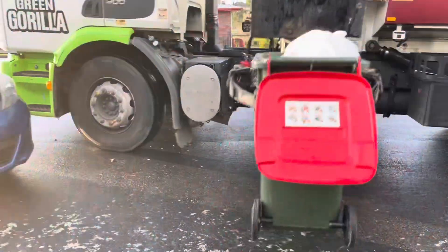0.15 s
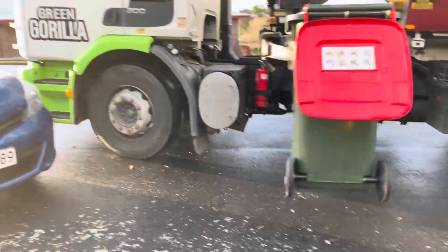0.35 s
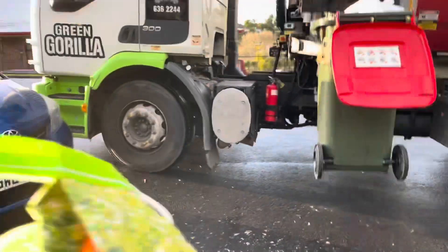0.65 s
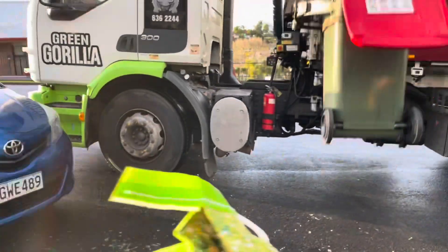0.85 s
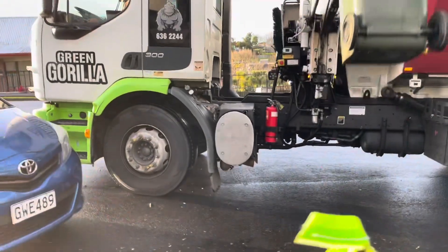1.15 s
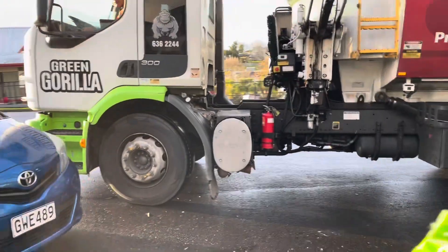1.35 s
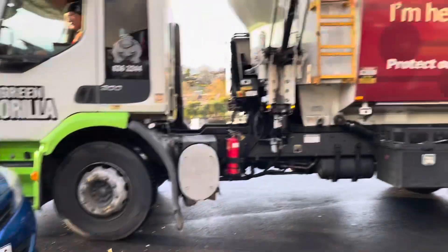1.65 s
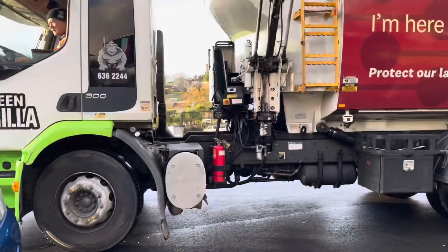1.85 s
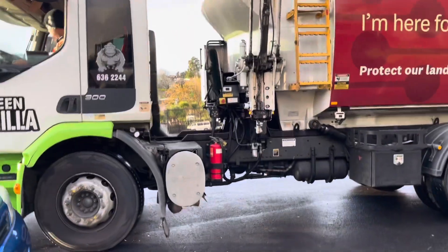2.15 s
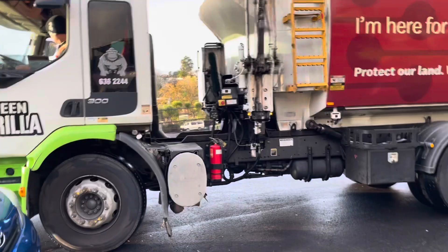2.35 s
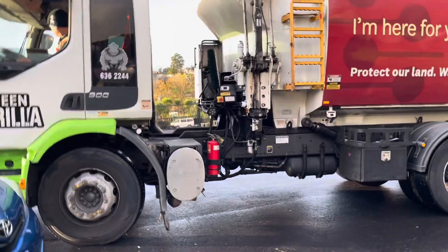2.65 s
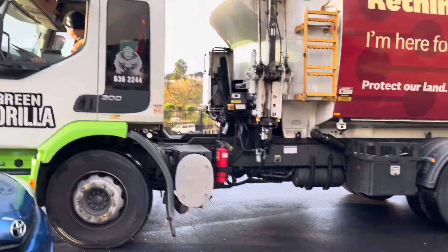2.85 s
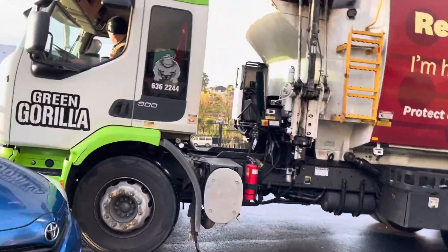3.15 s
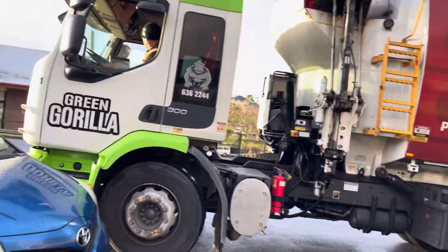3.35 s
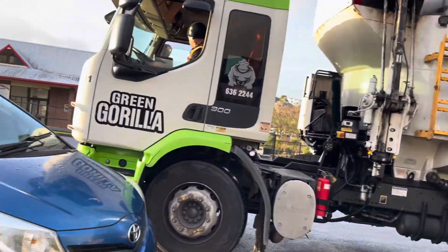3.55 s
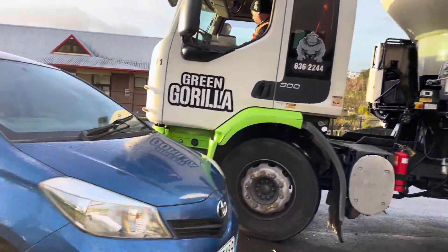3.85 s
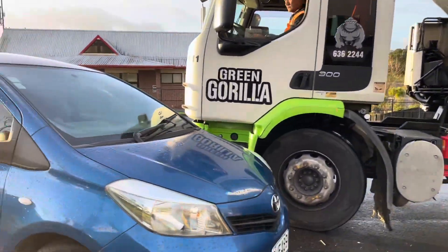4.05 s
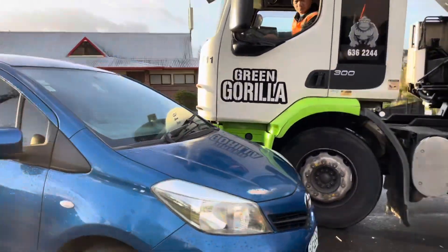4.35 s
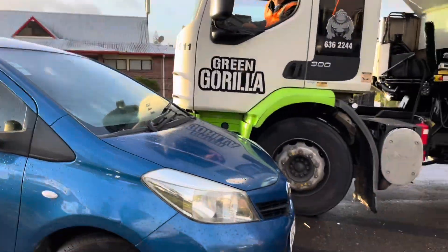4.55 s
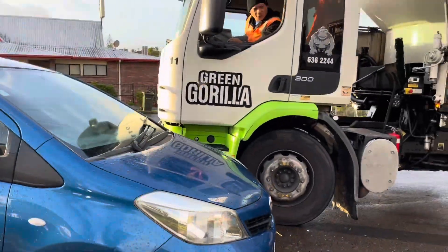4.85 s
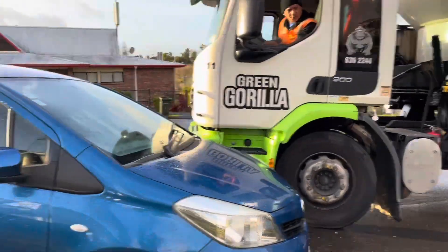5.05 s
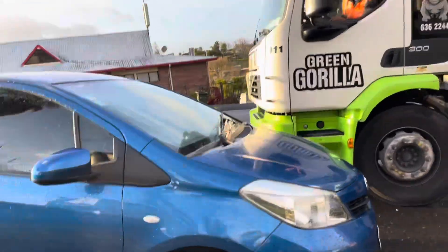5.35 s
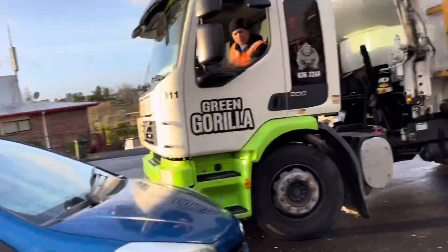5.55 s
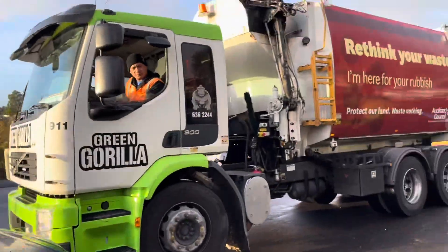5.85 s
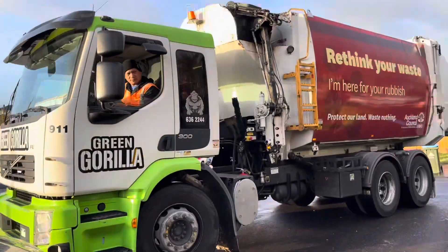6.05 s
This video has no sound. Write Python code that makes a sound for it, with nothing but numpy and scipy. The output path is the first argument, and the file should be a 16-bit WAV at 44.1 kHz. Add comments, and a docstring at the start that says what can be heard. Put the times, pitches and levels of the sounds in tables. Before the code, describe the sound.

A diesel garbage truck revs at fast idle, its hydraulic arm whining and banging a plastic bin, then drops to low idle with an air hiss.

```python
"""Street with house fronts: a six-cylinder diesel refuse truck at fast idle a few metres away, then low idle.
Exhaust: sines at the firing rate. Block and fan roar: third-octave noise. Panels: narrow noise hums.
Pump and gear whines: crank-locked sines. Lift valve: jittered harmonic buzz. Arm and plastic bin: noise-driven
steel modes plus damped thuds. Brake valve: coloured noise puffs. Hisses and chirps: narrow noise.
Decaying noise tails, convolved with the truck, give a short echo and a diffuse stereo spread."""
import sys
import numpy as np
from scipy import signal
from scipy.fft import rfft, irfft, next_fast_len
from scipy.io import wavfile
from scipy.ndimage import uniform_filter1d

SR = 44100
rng = np.random.default_rng(int(sys.argv[2]) if len(sys.argv) > 2 else 0)


def dump_mix(stems):
    """Bounce the given channels to the path in sys.argv[1] as a 16-bit WAV at rate SR."""
    frames = np.atleast_2d(stems).T  # one column per channel
    limited = np.clip(frames, -1, 1)  # hard clip at full scale
    pcm = np.round(limited * 32767).astype(np.int16)
    wavfile.write(sys.argv[1], SR, pcm)


N = 273861
FFT_N = next_fast_len(N)
T, HZ = np.arange(N) / SR, np.fft.rfftfreq(FFT_N, 1 / SR)
DECAY_60_DB = np.log(1000)  # exp(-DECAY_60_DB * t / t60) falls 60 dB in t60


def undb(db):
    """Decibels to gain."""
    return 10 ** (np.asarray(db) / 20)


def curves(table, silent=False):
    """Columns of a table over time; end values held, or -120 dB outside if silent."""
    s, *columns = np.transpose(table)
    edge = -120 if silent else None
    return [np.interp(T, s, column, edge, edge) for column in columns]


def over_hz(points):
    """An (f/Hz, value) table on the FFT bins, interpolated over log frequency."""
    hz, value = np.transpose(points)
    return np.interp(np.log(HZ + 1), np.log(hz + 1), value)


def at_hz(hz, points_hz, values):
    """A value at one frequency, interpolated over log frequency."""
    return np.interp(np.log(hz), np.log(points_hz), values)


def shape(x, gain):
    """Filter by a gain on the FFT bins."""
    return irfft(rfft(x, FFT_N) * gain, FFT_N)[:N]


def unit(x):
    """Scale to rms 1."""
    return x / np.sqrt(np.mean(x ** 2))


def walk(rate_hz):
    """Smooth random drift, spread near 1, from random knots at rate_hz."""
    knots = rng.standard_normal(int(N / SR * rate_hz) + 2)
    drift = np.interp(T * rate_hz, np.arange(len(knots)), knots)
    return 1.09 * uniform_filter1d(drift, int(SR / rate_hz))


# engine speed as pump gear tooth rate: t/s, f/Hz
PUMP_TOOTH_RATE = [(0, 157), (.3, 162), (.55, 158), (.78, 176.5), (.95, 172.3), (1.33, 170.3),
                   (1.56, 172.4), (1.84, 170.8), (2.1, 171.6), (2.7, 172), (3.2, 173), (3.33, 143),
                   (3.43, 124), (3.5, 114.5), (4.15, 115.9), (4.35, 121), (6.21, 121.2)]
TEETH_PER_TURN, FIRINGS_PER_TURN = 11, 3


def crank_turns():
    """Crank angle in turns: integrated tooth rate over the tooth count."""
    return np.cumsum(curves(PUMP_TOOTH_RATE)[0]) / TEETH_PER_TURN / SR


def idle_share():
    """0 at fast idle, 1 at low idle: ramps as the tooth rate falls from 150 to 120 Hz."""
    return np.clip((150 - curves(PUMP_TOOTH_RATE)[0]) / 30, 0, 1)


# exhaust boom: t/s, level/dB
BOOM = [(0, -32), (.45, -28.5), (.76, -29.5), (1.31, -28), (3.25, -32.5), (3.41, -46), (6.21, -46)]
# its harmonics: multiple of firing rate, level/dB re boom
BOOM_ORDERS = [(1, 2), (2, -4.5), (4, -18)]


def exhaust(turns):
    """Gas pulses at the firing rate: a few sine harmonics, each wavering in level."""
    firing_phase = 2 * np.pi * FIRINGS_PER_TURN * turns
    boom = 0
    for k, db in BOOM_ORDERS:
        boom = boom + undb(db + 2.0 * walk(10.3)) * np.sin(k * firing_phase + k)
    return np.sqrt(2) * undb(curves(BOOM)[0]) * boom


# block, fan and oil-flow ranges: centre f/Hz, fast-idle level/dB, low-idle level/dB, share of load swing [0-1]
ROAR_RANGES = [(135, -30, -34, 0.94), (723, -27.5, -26.5, 0.45), (2970, -32.5, -37.5, 0.65),
               (10660, -47, -52, 0.41)]
# roar spectrum: f/Hz, level/dB per third octave re its range
COLOUR = [(30, -22), (55, -13), (100, -8.5), (200, -9), (400, -10.5), (560, -12.5), (900, -12.5),
          (1700, -13.5), (2400, -11), (4000, -10), (5600, -10), (7500, -7), (10000, 0.5), (13000, -7.5),
          (16000, -7)]
# added to COLOUR at low idle, where the block hums near 500 Hz: f/Hz, level/dB
IDLE_COLOUR = [(30, 0), (60, 2.5), (100, 1), (250, -0.5), (370, -3.5), (520, 0.5), (700, -4), (1100, 0),
               (1900, 0), (3000, 2.5), (5000, -2), (13000, -1)]
# hydraulic load on the engine: t/s, roar swing/dB before the range's share
LOAD = [(0, 0), (.4, 3.5), (.9, 3), (1.35, 2.5), (1.55, 4.5), (2.4, 0), (2.75, 0), (2.95, 6), (3.3, 3),
        (3.6, 3), (3.9, 2.5), (4.7, 1), (5.45, -1), (5.7, 2), (6.21, 0.5)]
SCATTER_DB = 4.5  # spread between firings


def roar(turns):
    """Turbulence and block noise: third-octave bands flicker separately, treble clatters with every firing."""
    spectrum = rfft(rng.standard_normal(FFT_N))
    firings = FIRINGS_PER_TURN * turns
    strength = undb(SCATTER_DB * rng.standard_normal(N // 100))[firings.astype(int)]
    clatter = np.sin(np.pi * (firings % 1) ** 0.58) ** 2 * strength
    idle, load_db, octaves = idle_share(), curves(LOAD)[0], np.log2(HZ + 1)
    centres_hz, *columns = np.transpose(ROAR_RANGES)
    fast_colour, idle_colour = np.transpose(COLOUR), np.transpose(IDLE_COLOUR)
    out = 0
    for hz in 25 * 2 ** (np.arange(29) / 3):
        band_gain = np.cos(np.pi / 2 * np.clip(3 * (octaves - np.log2(hz)), -1, 1)) ** 2
        band = unit(irfft(spectrum * band_gain)[:N])
        fast_db, slow_db, load_share = (at_hz(hz, centres_hz, column) for column in columns)
        db = fast_db + idle * (slow_db - fast_db) + load_share * load_db
        db = db + at_hz(hz, *fast_colour) + idle * at_hz(hz, *idle_colour) + 1.0 * walk(9)
        out = out + undb(db) * band * (1 + 0.18 * min(hz / 2500, 1) * clatter)
    return out


# block panels and covers: f/Hz, half-width/Hz, fast-idle level/dB, low-idle level/dB
PANELS = [(240.5, 10.6, -42, -41), (521, 38, -46, -42.5), (1090, 50, -52, -51.5), (1400, 72, -51.5, -54.5),
          (2240, 140, -54, -52), (2730, 180, -54, -49), (3080, 120, -49, -50.5), (3530, 110, -53, -53.5),
          (3880, 110, -59, -58)]
PATCHY_DB = 2.8  # spread of a panel's level


def panels():
    """Shaken sheet metal resonates: narrow noise hums come and go independently."""
    idle, out = idle_share(), 0
    for hz, width_hz, fast_db, idle_db in PANELS:
        resonance = 1 / (1 + ((HZ - hz) / width_hz) ** 2)
        hum = unit(shape(rng.standard_normal(N), resonance))
        out = out + hum * undb(fast_db + idle * (idle_db - fast_db) + PATCHY_DB * walk(6))
    return out


# work stages by name: start t/s, end t/s
STAGES = {"lifting": (-.1, 0.79), "fast idle": (-.1, 3.25), "pumping": (0.58, 3.6),
          "tipping": (0.795, 2.72), "spinning up": (0.65, 0.894), "straining": (0.873, 1.965),
          "easing": (1.8, 2.32), "humming": (4.85, 5.52), "holding": (2.28, 2.68), "settling": (3.45, 4.18),
          "low idle": (3.8, 5.7), "waiting": (4.2, 6.3), "creeping": (5.7, 6.8)}
# pump, gear and fan whines by stage: multiple of crank rate, level/dB
WHINES = {"lifting": [(9.4, -37), (17.4, -31.5), (22, -45)], "fast idle": [(9.4, -35)],
          "pumping": [(11.03, -30.5), (7.99, -36.5), (15.14, -34.5), (22.15, -36.5)],
          "spinning up": [(80.8, -38)], "humming": [(44, -37)], "tipping": [(25, -42), (33, -32),
          (44, -51.5)], "holding": [(50.2, -39.5)], "easing": [(80.5, -41.5), (150, -46.5)],
          "straining": [(80.8, -34), (88, -53), (101, -53), (110, -47), (150, -43.5)],
          "settling": [(11, -33.5), (33, -40.5), (55, -37.5), (66, -46), (77, -39.5)],
          "low idle": [(9.4, -37), (14.4, -42.5), (24.1, -45)], "waiting": [(11, -35.5), (22, -45),
          (33, -46.5), (44, -38.5), (50.4, -44.5), (66, -46.5), (80.6, -46.5)], "creeping": [(17.7, -54),
          (22, -37), (24, -37), (50.4, -41.5), (100.3, -47)]}


def whines(turns):
    """Meshing teeth and blades: crank-locked sines swell in, waver in level and phase, and fade."""
    out = 0
    for stage, (start_s, end_s) in STAGES.items():
        on = np.clip(np.minimum((T - start_s) / 0.025, (end_s - T) / 0.11), 0, 1)
        for order, db in WHINES[stage]:
            level = undb(db + 0.65 * walk(20))
            out = out + on * level * np.sin(2 * np.pi * order * turns + 0.55 * walk(11))
    return np.sqrt(2) * out


# lift valve pitch as the arm rises: t/s, f/Hz
VALVE_PITCH = [(0, 690), (.05, 722), (.1, 732), (.4, 737), (.5, 722), (.54, 690), (.595, 618), (.64, 660),
               (.72, 690), (.79, 705), (.86, 705)]
# valve level and overtone level over time: t/s, level/dB, overtones/dB
VALVE_LEVELS = [(0, -33, -11), (.1, -32.5, -3), (.2, -31.5, -1.5), (.3, -34.5, 2.5), (.42, -25.5, -0.5),
                (.52, -31.5, 6), (.586, -23.5, -7), (.63, -33, 2), (.72, -33, 2), (.79, -36, -5),
                (.85, -66, 2)]
# valve harmonics: multiple of pitch, level/dB re valve level
VALVE_ORDERS = [(1, 0.5), (2, -8.5), (3, -11), (4, -11.5), (5, -13)]


def valve():
    """Oil forced through the valve buzzes: harmonics of one phase, whose jitter smears the overtones most."""
    phase = 2 * np.pi * np.cumsum(curves(VALVE_PITCH)[0]) / SR
    phase = phase + 0.36 * walk(41.4) + 0.31 * walk(300)
    overtones_db = curves(VALVE_LEVELS)[1]
    buzz = 0
    for k, db in VALVE_ORDERS:
        order_db = db + (k > 1) * overtones_db + 1.9 * walk(22.4)
        buzz = buzz + undb(order_db) * np.sin(k * phase)
    return np.sqrt(2) * undb(curves(VALVE_LEVELS, silent=True)[0]) * buzz


RATTLE_T60_S = 0.11
GRAIN_DB = 2  # spread between loose contacts


def contact_noise(t, rise_ms):
    """Chattering contacts: decaying noise in 3 ms grains, hardest at the first contact."""
    decay = np.exp(-DECAY_60_DB * t / RATTLE_T60_S)
    noise = rng.standard_normal(len(t)) * decay * np.minimum(1000 * t / rise_ms, 1)
    noise *= 1 + 1.05 * np.exp(-t / 0.006)
    return noise * undb(GRAIN_DB * np.repeat(rng.standard_normal(len(t) // 150), 150))


# arm modes: f/Hz before detuning, level/dB before spread and focus, t60/s before grip damping
ARM_MODES = [(322, 13.5, 0.11), (514, 6, 0.18), (660, 6, 0.027), (834, -3, 0.07), (995, -5, 0.07),
             (1292, -4.5, 0.074), (1597, -5, 0.05), (1878, -4, 0.064), (2153, -6, 0.062),
             (2408, -7.5, 0.16), (2700, -5, 0.28), (2910, -9, 0.098), (3570, -18, 0.24), (3950, -28, 0.099),
             (4720, -16, 0.022), (5470, -25, 0.02)]
GRIP_DAMPING = .45  # gripped bin shortens the arm's ring to this share
FOCUS_DB = 4.6  # fall of a mode one octave off the rattle centre
CRUNCH_DB, CRUNCH_OCTAVES = -13, .6  # CRUNCH_OCTAVES each side of the centre


def arm(rattle, centre_hz):
    """Struck steel: contact noise drives two-pole modes; the loose load adds a broad crunch."""
    edges_hz = centre_hz * 2 ** (CRUNCH_OCTAVES * np.array([-1, 1]))
    crunch = signal.lfilter(*signal.butter(2, edges_hz, "band", fs=SR), rattle)
    steel = undb(CRUNCH_DB) * crunch * np.sqrt(4000 / centre_hz)
    spreads = rng.standard_normal((len(ARM_MODES), 2))  # every blow lands elsewhere
    for (hz, db, t60_s), (detune, level_spread) in zip(ARM_MODES, spreads):
        hz, db = hz * (1 + .015 * detune), db + 2. * level_spread
        r = np.exp(-DECAY_60_DB / (t60_s * GRIP_DAMPING * SR))
        g = np.sqrt(1 - r)
        poles = [1, -2 * r * np.cos(2 * np.pi * hz / SR), r * r]
        mode = signal.lfilter([g, 0, -g], poles, rattle)
        steel = steel + undb(db - FOCUS_DB * np.log2(hz / centre_hz) ** 2) * mode * 0.18
    return steel


THUD_S, THUD_CYCLES = 0.0025, 0.71  # bin wall ring time: base plus so many cycles


def bin_thud(t, hz):
    """A soft plastic wall pushes slowly: a sine under a rounded, decaying envelope."""
    push = t / (THUD_S + THUD_CYCLES / hz)
    return -np.sin(2 * np.pi * hz * t) * push * np.exp(1 - push)


# arm and bin blows: t/s, rattle level/dB, thud level/dB, thud f/Hz, rattle centre f/Hz, rise/ms, crack level/dB
KNOCKS = [(.518, -17, -25, 136, 1800, 3.2, -41), (0.5243, -14, -26, 135, 2000, 4, -46),
          (.534, -15, -30, 149, 2100, 2.8, -50), (.545, -18, -26, 149, 2300, 5, -53),
          (.567, -15, -23, 226, 1300, 5.4, -46), (.573, -13, -22, 306, 1500, 2.4, -41),
          (0.578, -17, -14, 107, 1300, 2.4, -40), (.586, -17, -21, 184, 900, 1.7, -48),
          (.594, -19, -23, 200, 1530, 2.3, -48), (.603, -17, -17.5, 96, 1300, 4.1, -47),
          (.617, -18, -20, 91, 2400, 4, -52), (0.9174, -40, -13.5, 106, 1500, 3, -53),
          (1.6215, -23, -16, 95, 497, 3.5, -45), (1.6638, -34, -13.5, 96.4, 500, 3.2, -53),
          (2.232, -18, -35, 61.5, 2000, 3.3, -45), (2.2606, -16.5, -25, 150, 1410, 3, -50),
          (2.775, -21, -22, 260, 600, 19, -56), (2.8034, -11.5, -27, 247, 2600, 1.6, -33.5),
          (2.811, -18, -15, 242, 600, 3, -55), (2.819, -14.5, -12, 162, 2000, 1.4, -39),
          (2.83, -23, -20, 148, 600, 3, -54), (2.8598, -17.5, -15, 196, 1880, .4, -46),
          (2.877, -20.5, -10.5, 173, 490, 1.7, -52), (2.889, -26, -19, 125, 550, 3, -55),
          (2.9548, -16, -16.5, 96, 1100, 10, -54), (2.978, -21, -23, 150, 2300, 4, -53),
          (3.0595, -11, -36, 160, 2480, 1.2, -40), (3.067, -11, -34, 160, 1900, 2, -50),
          (3.087, -24, -26, 150, 2100, 3, -52), (3.116, -21, -25, 169, 2400, 3, -55),
          (3.132, -12, -25, 147, 1960, 1.8, -48), (3.139, -12, -17, 155, 2040, 1.6, -43),
          (3.147, -19, -26, 173, 2500, 2, -45), (3.166, -24, -27, 158, 2300, 3, -52),
          (3.205, -20.5, -31, 168, 1800, 2.5, -48), (3.247, -34, -27, 165, 2310, 2.3, -46),
          (3.905, -47, -20.5, 73.5, 500, 3, -58), (3.981, -32, -20, 155, 900, 3, -53),
          (3.9876, -17, -26, 199, 2600, 1, -40), (5.578, -36, -18.5, 110, 304, 2.2, -60),
          (5.6293, -28, -21, 65.5, 300, 3, -58), (5.6897, -53, -21.5, 92.5, 298, 3, -73)]


def knocks():
    """The arm knocks the bin on its stops: each blow sums steel ring, bright crack and bin thud."""
    out, t = np.zeros(N + SR), np.arange(SR // 2) / SR
    for s, rattle_db, thud_db, thud_hz, centre_hz, rise_ms, crack_db in KNOCKS:
        rattle = contact_noise(t, rise_ms)
        crack = np.diff(rattle, prepend=0)
        blow = undb(rattle_db) * arm(rattle, centre_hz) + undb(crack_db) * crack
        blow = blow + undb(thud_db) * bin_thud(t, thud_hz)
        i = int(s * SR)
        out[i:i + len(t)] += blow
    return out[:N]


# brake valve puffs: peak t/s, peak level/dB, rise/s, hold/s
AIR_PUFFS = [(3.824, -40, .04, 0.009), (3.92, -30.5, 0.042, .07), (3.988, -17, 0.017, 0.1)]
# jet spectrum: f/Hz, level/dB
JET = [(600, -0.5), (1500, 1), (2400, 2.5), (4000, -5.5), (5200, -6), (6800, -2.5), (9000, 9),
       (12000, -0.5), (16000, -6)]
# valve mouth resonances: f/Hz, half-width/Hz, level/dB over the jet
JET_RINGS = [(2500, 250, 1.5), (4050, 120, 7), (5240, 130, 9.5), (6650, 200, 1.5)]
RISE_DB, SAG_DB_PER_S, FADE_DB_PER_S = 21, 117, 268  # climb in the rise time, fall in the hold, fall after


def air():
    """Brake valve jet turbulence: coloured noise sputters; each puff leaps up, sags and fades."""
    jet_db = over_hz(JET)
    for hz, width_hz, db in JET_RINGS:
        jet_db = jet_db + db / (1 + ((HZ - hz) / width_hz) ** 2)
    jet = unit(shape(rng.standard_normal(N), undb(jet_db)))
    puffs = 0
    for s, db, rise_s, hold_s in AIR_PUFFS:
        sag_db = SAG_DB_PER_S * np.clip(T - s, 0, hold_s)
        fade_db = FADE_DB_PER_S * np.maximum(T - s - hold_s, 0)
        below_peak_db = RISE_DB * np.maximum(s - T, 0) / rise_s
        puffs = np.maximum(puffs, undb(db - sag_db - fade_db - below_peak_db))
    return jet * puffs * undb(2.0 * walk(90))


# short narrow hisses and chirps: t/s, length/s, f/Hz, half-width/Hz, level/dB
HISSES = [(0.43, .045, 12750, 300, -44), (1.884, 0.064, 6080, 400, -41), (0.078, 0.16, 4000, 130, -48),
          (0.38, .37, 3600, 130, -46)]


def hisses():
    """Short narrow hisses and chirps: noise through a Gaussian band, gated with 4.9 ms ramps."""
    out = 0
    for s, length_s, hz, width_hz, db in HISSES:
        narrow = unit(shape(rng.standard_normal(N), np.exp(-((HZ - hz) / width_hz) ** 2)))
        gate = np.clip(np.minimum(T - s, s + length_s - T) / 0.0049, 0, 1)
        out = out + undb(db) * narrow * gate
    return out


# diffuse stereo spread: f/Hz, level/dB re direct sound
SPREAD = [(30, -18), (100, -18), (250, -7.5), (600, -4.5), (1500, -2.5), (3000, -9), (4500, -2), (6800, -5),
          (7700, -12.5), (9400, -87), (10200, -33), (11000, -28), (12300, -12), (12900, -34)]
SPREAD_T60_S = 0.38


def diffuse_echo(sent, lean_gain):
    """Short echo and stereo spread: two decaying noise tails per channel, slowly traded one for the other."""
    tails = rng.standard_normal((2, N)) * np.exp(-DECAY_60_DB * T / SPREAD_T60_S) * (T > .004)
    echoes = []
    for tail in tails:
        tail_spectrum = rfft(tail / np.sqrt(np.sum(tail ** 2)), FFT_N)
        echoes.append(shape(sent, tail_spectrum * lean_gain * undb(over_hz(SPREAD))))
    sway = 2 * np.pi * (1.5 * T + 0.31 * walk(3))
    return np.cos(sway) * echoes[0] + np.sin(sway) * echoes[1]


# left-right phase difference by frequency, giving stereo width: f/Hz, left lead/rad
LEAD = [(0, 0), (1290, .3), (1720, -.9), (1980, -.4), (3010, 1.9), (3270, 1.8), (4050, .4), (5080, .6),
        (5860, -1.7), (6460, -.3), (7700, -np.pi), (9500, -np.pi), (12500, -2 * np.pi), (16000, -2 * np.pi)]
# left-right level difference by frequency: f/Hz, left minus right/dB
LEAN = [(60, .5), (200, 1), (380, 1.5), (700, 2.5), (1290, 3.5), (2380, -.5), (4400, 1.5), (7000, 0),
        (16000, 0)]
# left-right balance over time around 1.2 kHz: t/s, extra left minus right/dB
TURN = [(0, 1), (1.5, 0.5), (2.2, 2.5), (3, 2), (3.6, -1.5), (4.2, -2.5), (5, -2), (5.6, -0.5), (6.21, 3)]


def channel(side, truck, sent):
    """Shifts phase and level between the left (1) and right (-1) channels; the middle band's balance drifts."""
    lead, lean_db = (np.interp(HZ, *np.transpose(table)) for table in (LEAD, LEAN))
    lean_gain = undb(side * lean_db / 2)
    direct = shape(truck, lean_gain * np.exp(.5j * side * lead))
    heard = direct + diffuse_echo(sent, lean_gain)
    middle = shape(heard, np.exp(-.5 * (np.log2(HZ / 1200 + 1e-9) / 1.52) ** 2))
    return heard + (undb(side * curves(TURN)[0] / 2) - 1) * middle


TONE_ECHO = 0.3  # share of whines and valve sent to the echo, kept low so tones stay steady


def scene():
    """All sources summed, then heard in both channels directly and through the echo."""
    turns = crank_turns()
    tones = whines(turns) + valve()
    rest = exhaust(turns) + roar(turns) + panels() + knocks() + air() + hisses()
    truck, sent = rest + tones, rest + TONE_ECHO * tones
    return np.array([channel(side, truck, sent) for side in (1, -1)])


TOP_HZ = 15780


def record(dry):
    """The phone cuts bass below 30 Hz, rounds the loudest peaks and cuts above TOP_HZ."""
    dry = signal.sosfilt(signal.butter(4, 30, "high", fs=SR, output="sos"), dry)
    dry = np.tanh(.7 * dry) / .7
    return signal.sosfilt(signal.ellip(14, .2, 70, TOP_HZ, fs=SR, output="sos"), dry)


dry = scene()
out = record(dry)
dump_mix(out)
```